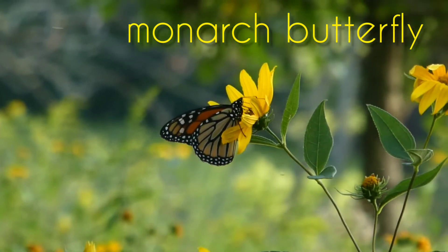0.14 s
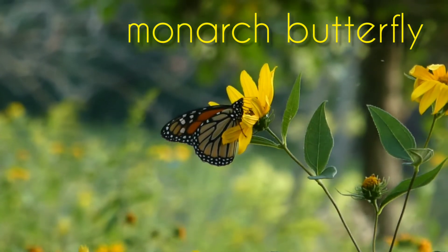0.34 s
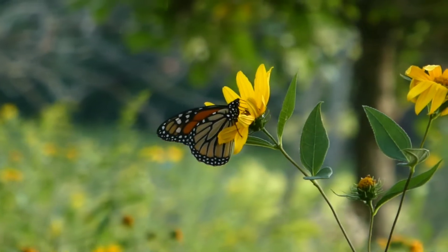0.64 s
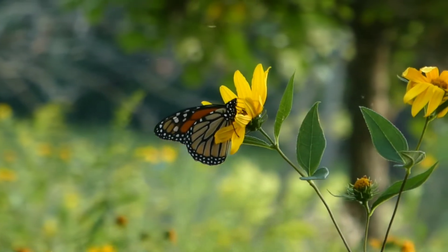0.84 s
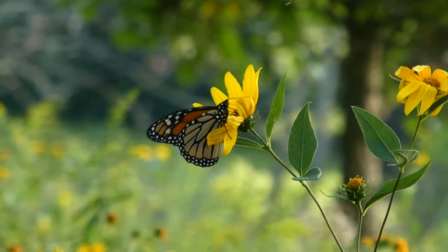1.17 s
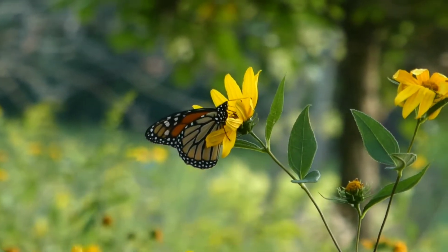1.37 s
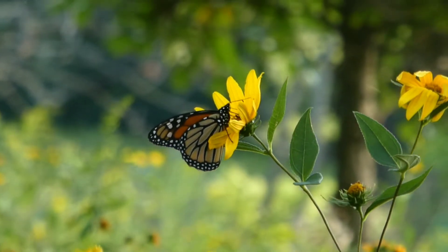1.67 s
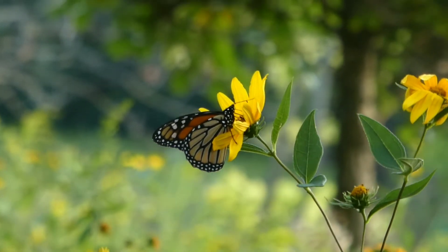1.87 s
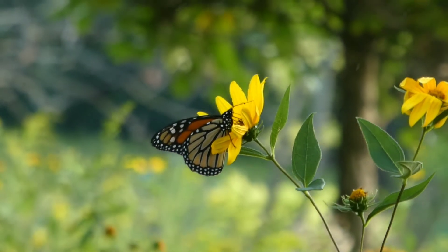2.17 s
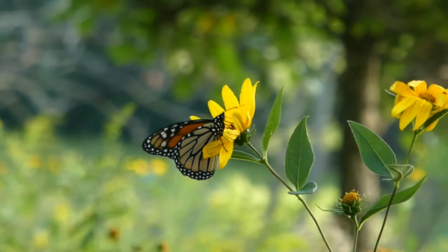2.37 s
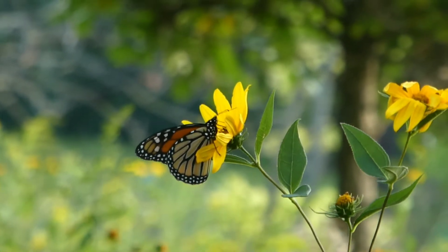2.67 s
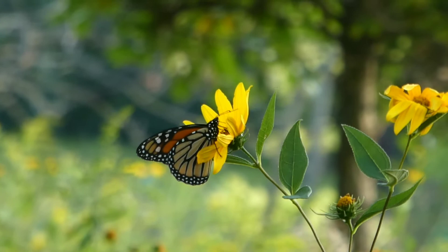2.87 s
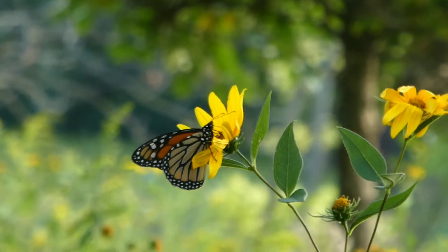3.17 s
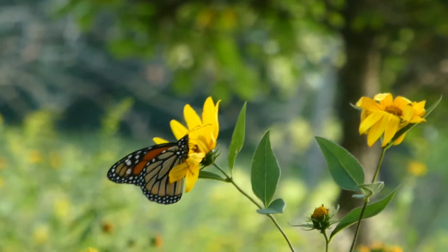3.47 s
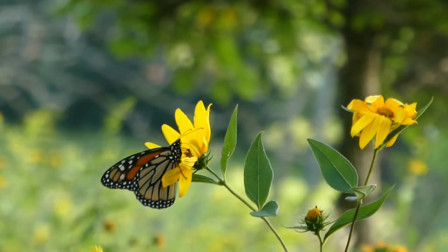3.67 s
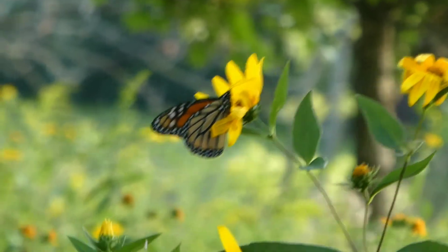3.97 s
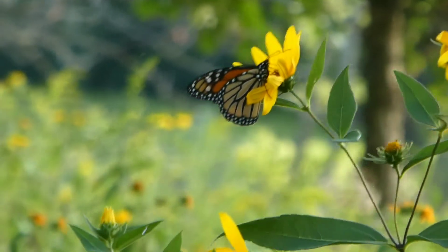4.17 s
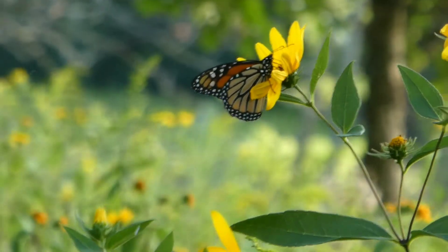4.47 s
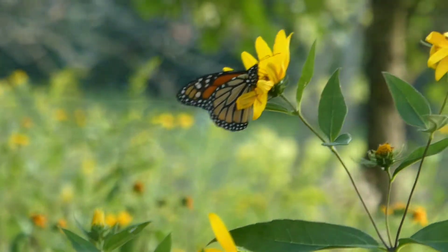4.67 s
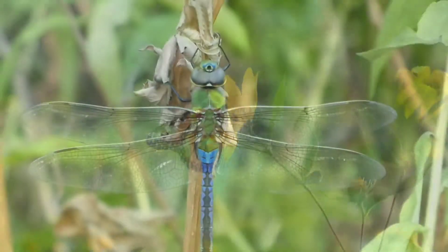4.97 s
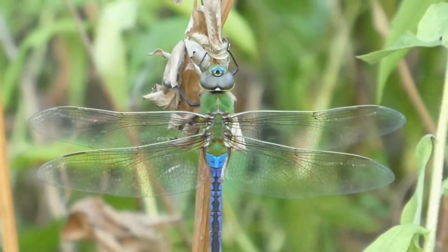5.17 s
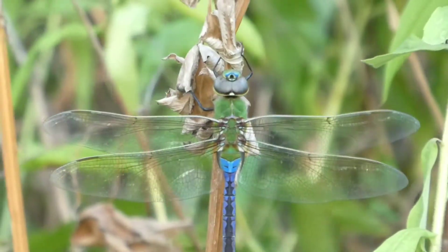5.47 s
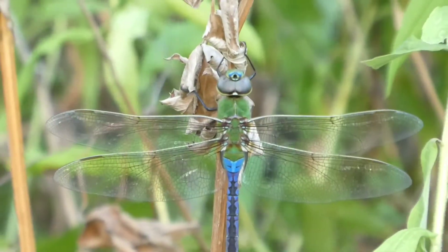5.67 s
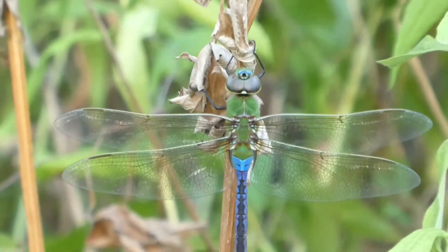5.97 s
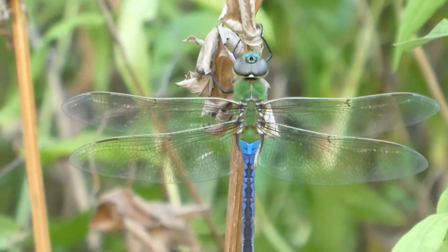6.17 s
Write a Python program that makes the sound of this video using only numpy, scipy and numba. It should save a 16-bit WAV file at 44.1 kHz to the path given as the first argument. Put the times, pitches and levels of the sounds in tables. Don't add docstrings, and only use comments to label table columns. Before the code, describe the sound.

From 0 s a cicada close by is in full song: a loud, dry, high rasp made of hundreds of clicks per second, centred around four to six kilohertz. Roughly every 0.55 s it dips briefly, clicks quickening while the resonance drops to a tighter, lower whirr, then rises again, a continuous see-saw. A quieter neighbour, slightly to the left, pulses out of step, and a far chorus hisses behind. Leaves blur the clicks a little. Beneath lie faint airy noise, a wandering low traffic hum and soft wind buffeting, strongest around 1.8 s. A distant vehicle swells near 4.3 s, and the road sound ends just after 5 s. From about 4.5 to 5.4 s the pulsing singers crossfade away into a dense, even, slightly flickering insect hiss of similar loudness, which continues steadily to the cut at about 6.3 s, rising slightly.

```python
import sys
import numpy as np
from scipy import signal
from scipy.fft import rfft, irfft, next_fast_len
from scipy.io import wavfile
from scipy.ndimage import uniform_filter1d
from numba import njit

SR = 44100
rng = np.random.default_rng(int(sys.argv[2]) if len(sys.argv) > 2 else 0)


def put_to_file(sound):
    columns = np.atleast_2d(sound).T
    safe = np.clip(columns, -1, 1)
    whole_steps = np.round(safe * 32767)
    wavfile.write(sys.argv[1], SR, whole_steps.astype(np.int16))


def linear_from_db(decibels):
    return 10 ** (np.asarray(decibels, float) / 20)


N = 279594
TIME = np.arange(N) / SR


def level(x, db):
    return x * linear_from_db(db) / np.sqrt(np.mean(x ** 2))


def columns(table, at):
    s, *rest = np.transpose(table)
    return [np.interp(at, s, c) for c in rest]


def colour(x, points):
    hz, db = np.transpose(points)
    size = next_fast_len(N)
    f_hz = np.maximum(np.arange(size // 2 + 1) * SR / size, 1)
    gain = linear_from_db(np.interp(np.log(f_hz), np.log(hz), db))
    return irfft(rfft(x, size) * gain, size)[..., :N]


def walk(rate_hz):
    hold = int(SR / rate_hz)
    steps = np.repeat(rng.standard_normal(N // hold + 1), hold)
    return 1.3 * uniform_filter1d(uniform_filter1d(steps, hold), hold)[:N]


def swells(s, length_s, db, floor_db):
    shape = np.cos(np.pi * np.clip((TIME[:, None] - s) / (2 * length_s), -.5, .5)) ** 2
    power = (shape * linear_from_db(db)) ** 2 @ np.ones(len(s))
    return np.sqrt(linear_from_db(floor_db) ** 2 + power)


@njit
def svf(x, hz, width_hz):
    y, b, l = np.empty(len(x)), 0., 0.
    for i in range(len(x)):
        g, k = np.tan(np.pi * hz[i] / SR), width_hz / hz[i]
        v = (b + g * (x[i] - l)) / (1 + g * (g + k))
        b, l, y[i] = 2 * v - b, l + 2 * g * v, k * v
    return y


def clicks(when_s, size):
    out, at = np.zeros(N + 32), np.clip(when_s * SR, 0, N)
    for tap in range(-7, 9):
        d = tap - at % 1
        window = (1 + np.cos(np.pi * d / 8)) / 2
        np.add.at(out, at.astype(int) + tap + 8, size * np.sinc(d) * window)
    return out[8:N + 8]


def cicada(dips, song_db, pan_db, haze_db):
    # t from the dip/s, share of top click rate/1, abdomen f/Hz, level/dB
    cycle = [
        (-.3, .705, 5700, -1.5),
        (-.14, .835, 5900, -0.5),
        (-.105, .945, 5900, -0.5),
        (-.075, .99, 5300, 1),
        (-.05, 1.001, 4180, 0.9),
        (.02, .997, 3650, -0.65),
        (.045, .87, 3800, -1.5),
        (.085, .71, 5300, -3),
        (.3, .705, 5870, -1.5),
    ]
    s, top_hz, dip_db = np.transpose(dips)
    nearest = np.searchsorted((s[1:] + s[:-1]) / 2, TIME)
    share, body_hz, db = columns(cycle, TIME - s[nearest])

    raised_hz, lowered_hz = 5700, 4230
    rib_high_hz, rib_low_hz = 6040, 4350
    rib_high_db, rib_low_db, rib_mute_db = -0.5, 0.5, -3.5
    low = np.clip((raised_hz - body_hz) / (raised_hz - lowered_hz), 0, 1)
    rib_hz = rib_high_hz + (rib_low_hz - rib_high_hz) * low
    moving = np.clip(np.maximum(3.4 * np.minimum(low, 1 - low), low * (1 - share) / 0.14), 0, 1)
    rib_db = rib_high_db + (rib_low_db - rib_high_db) * low + rib_mute_db * moving
    treble_db = -12.5 - 3.5 * low ** 2
    body_hz = body_hz * (1 + .035 * walk(30))

    phase = np.cumsum(share * np.interp(TIME, s, top_hz)) / SR
    beat = np.arange(1, int(phase[-1]))
    when_s = np.interp(beat, phase, TIME)
    second_tymbal = beat % 2
    chance = rng.standard_normal((3000, 2))[:len(beat)].T
    slack = np.clip((1 - share) / .3, 0, 1)
    loose = np.interp(when_s, TIME, slack)
    when_s = when_s + (2e-6 + 2.5e-5 * loose ** 2) * chance[0] + 6.5e-5 * second_tymbal
    size = linear_from_db(-5 * loose * second_tymbal + (.8 + 1.5 * loose) * chance[1])

    rattle = rng.standard_normal(N) * np.exp(-(phase % 1) / .6) * linear_from_db(haze_db + 12 * slack ** 2)
    x = clicks(when_s, size) + rattle
    body = svf(svf(svf(x, body_hz, 3500.0), body_hz, 3500.0), body_hz, 3500.0)
    rib = svf(svf(x, rib_hz, 380.0), rib_hz, 380.0) * linear_from_db(rib_db + 2.5)
    snap = colour(x, [(2500, -31), (3500, 6), (6500, 7.5), (8000, -14.0), (11300, -11.0),
                      (12000, -26), (15000, -45)])
    fizz = colour(rattle, [(6000, -3), (7500, 6.0), (8500, 4.5), (11300, -13.5), (12000, -23), (15000, -35)])
    voice = body + rib + (snap + fizz) * linear_from_db(treble_db + 5.0)
    voice = colour(voice, [(2300, -16), (3000, -5.5), (3300, 2.1), (6400, -2.2), (7200, -2.5), (12000, 1.5)])
    voice = level(voice, song_db) * linear_from_db(db + np.interp(TIME, s, dip_db))
    return voice * linear_from_db(np.array([[pan_db], [-pan_db]]) / 2)


def leaves(x):
    tail_db, t60_s = 0.5, .025
    t = np.arange(2048) / SR
    tail = rng.standard_normal((2, len(t))) * linear_from_db(-60 * t / t60_s)
    tail *= linear_from_db(tail_db) / np.sqrt(np.sum(tail ** 2, axis=1, keepdims=True))
    size = next_fast_len(N + len(t))
    echo = 1 + rfft(tail[0] + 0.22 * tail[1] * np.array([[1], [-1]]), size)
    return irfft(rfft(x, size) * echo / np.sqrt(np.abs(echo)), size)[:, :N]


def chorus(mid, side, mid_db, side_db, scatter_db):
    out = 0
    for lo_hz, hi_hz in [(20, 4200), (4200, 5400), (5400, 7500), (7500, 20000)]:
        scatter = uniform_filter1d(rng.standard_normal((2, N)), size=24) * 2.6
        grain = rng.standard_normal((2, N)) * linear_from_db(scatter_db * scatter)
        band = signal.butter(3, [lo_hz, hi_hz], "band", fs=SR, output="sos")
        flicker_db = 0.88 * walk(4.154) + 0.64 * walk(10)
        out = out + signal.sosfilt(band, grain) * linear_from_db(flicker_db)
    return level(colour(out[0], mid), mid_db) + level(colour(out[1], side), side_db) * [[1], [-1]]


def air(points, db, side_db, wide_hz):
    mid, side = colour(rng.standard_normal((2, N)), points)
    side = level(side, db + side_db)
    return level(mid, db) + colour(side, [(wide_hz / 2, -8.0), (wide_hz, 0)]) * [[1], [-1]]


def traffic():
    # loudest t/s, length/s, rumble level/dB, hum level/dB, hum f/Hz
    passes = [(.1, 0.43, -40, -48, 411), (0.501, 0.32, -44, -47.5, 410), (0.756, .3, -42, -49, 407),
              (1.635, 0.74, -41.5, -52, 397), (2.31, 0.38, -41.5, -51, 395), (2.749, 0.57, -39.5, -53, 400),
              (3.498, 0.74, -43, -52, 400), (4.281, 0.6, -34.5, -43.5, 392), (4.953, 0.42, -41, -43, 388)]
    road_db, road_ends_s = -48, 5.2
    s, length_s, db, hum_db, hum_hz = np.transpose(passes)
    rumble_hz = 339 * (1 + 0.036 * walk(6))
    hum_hz = np.interp(TIME, s, hum_hz) * (1 + 0.01198 * walk(8))
    mid, side, fine = rng.standard_normal((3, N))
    broad = [svf(svf(v, rumble_hz, 355.0), rumble_hz, 355.0) for v in (mid, side)]
    tone = np.sin(2 * np.pi * np.cumsum(hum_hz) / SR) * linear_from_db(3.3 * walk(18))
    hum = level(tone, -2.2) + level(svf(svf(fine, hum_hz, 53.0), hum_hz, 53.0), -3.5)
    rumble = level(broad[0], -3.5) + level(broad[1], -11.5) * [[1], [-1]]
    rumble = rumble * linear_from_db(2.04 * walk(12))
    out = rumble * swells(s, length_s, db, road_db)
    out = out + hum * swells(s, 0.72 * length_s, hum_db, road_db - 11)
    return out * np.clip((road_ends_s - TIME) / 0.075, 0, 1)


def wind():
    # strongest t/s, length/s, level/dB
    gust_table = [(0.856, 0.81, -48.5), (1.433, 0.58, -44.5), (1.82, 0.55, -40), (2.758, .6, -45.5),
                  (3.245, 0.31, -45), (3.7, 0.27, -48), (4.501, 0.56, -59)]
    calm_db = -60
    mid, side = colour(rng.standard_normal((2, N)), [(20, -28), (60, -7), (120, 3.0), (230, -5),
                                                     (400, -13), (900, -38)])
    gust = swells(*np.transpose(gust_table), calm_db) * linear_from_db(2.0 * walk(7.68))
    return (level(mid, -5.5) + level(side, 1.2) * [[1], [-1]]) * gust


def scene():
    # t/s, top click rate f/Hz, level/dB
    near_dips = [(-.165, 414.3, 1.5), (.406, 414.5, -1), (.976, 414.8, -0.5), (1.541, 418.3, -0.7),
                 (2.097, 420, -1.5), (2.658, 418.5, -0.5), (3.201, 421, -1.5), (3.749, 419.2, -1),
                 (4.305, 418.8, -1.8), (4.85, 420.4, -5.5), (5.4, 421, 7)]
    # t/s, top click rate f/Hz, level/dB
    neighbour_dips = [(-.27, 430, 6), (.25, 423, 2.5), (.75, 427, 5), (1.3, 423.8, -2), (1.82, 427.7, 0),
                      (2.33, 425, -2.5), (2.87, 424.8, -0.5), (3.4, 423, -4), (3.93, 421.6, 0.5),
                      (4.5, 427, -9), (5.05, 423, 10), (5.6, 429, -6.0)]
    # f/Hz, level/dB (per Hz)
    first_mid = [(1180, -27.5), (2000, -35.5), (2540, -20.5), (3040, -12), (3430, -5), (3580, -3),
                 (4660, -2), (5210, -5), (5820, 0), (6230, -4.5), (7520, -14), (11000, -25.5), (11600, -37),
                 (12000, -29), (15400, -40)]
    first_side = [(1180, -43), (2000, -18), (2630, -14), (3430, -1), (4170, 2), (4280, -4), (4580, -1.5),
                  (5870, -1), (7150, -8.5), (11000, -11.5), (15400, -28)]
    second_mid = [(1180, -59), (2000, -49), (2770, -19.5), (3090, -12), (3340, -8), (3640, -2),
                  (3930, -1.5), (4240, -2.5), (5080, -3), (6020, 0.5), (7650, -15.5), (8480, -14),
                  (9080, -20), (11900, -26.5), (15400, -48)]
    second_side = [(1180, -50), (2000, -52), (2770, -12), (3670, 2), (4030, 0), (4990, -4), (5440, 2.5),
                   (6070, -2), (7650, -10), (11600, -14.5), (15400, -33)]
    # f/Hz, level/dB (per Hz)
    first_air = [(15, -49), (25, -36), (76, -1.5), (216, -5.5), (278, 1), (403, -9), (479, -7.5),
                 (721, -4.5), (965, -5), (2270, -13), (2600, -18), (3380, -7), (5720, -120)]
    second_air = [(15, -60), (25, -30), (70, -6.5), (138, -1.5), (189, -4.5), (289, -6), (452, -10),
                  (795, -5), (2100, -12), (2600, -14), (3380, -40), (5720, -120)]
    # t/s, level/dB, left minus right/dB
    swell = [(0.0, -0.5, -0.5), (0.28, -0.36, -1.5), (4.22, 0.86, -1.5), (4.82, 1.3, -1.0),
             (5.05, -0.3, 0.5), (6.23, 0.1, 1.0), (6.34, 1, -0.5)]
    # start t/s, end t/s
    dissolve_s = (4.49, 5.43)

    swell_db, pan_db = columns(swell, TIME)
    singers = cicada(near_dips, song_db=-25.5, pan_db=-0.5, haze_db=-32)
    singers = singers + cicada(neighbour_dips, song_db=-34.5, pan_db=3.5, haze_db=-20)
    first = leaves(singers) + chorus(first_mid, first_side, mid_db=-29.5, side_db=-39.5, scatter_db=0.4)
    first = first + air(first_air, db=-43.0, side_db=-5.5, wide_hz=200.)
    second = chorus(second_mid, second_side, mid_db=-23.0, side_db=-34.5, scatter_db=1.3)
    second = second + air(second_air, db=-43.0, side_db=-5.5, wide_hz=310.0)
    mix = np.clip((TIME - dissolve_s[0]) / (dissolve_s[1] - dissolve_s[0]), 0, 1)
    insects = ((1 - mix) * first + mix * second) * linear_from_db(swell_db)
    return (insects + traffic() + wind()) * linear_from_db(np.array([pan_db, -pan_db]) / 2)


def top_cut(x):
    return signal.sosfilt(signal.butter(12, 15570, fs=SR, output="sos"), x)


def record(dry):
    return top_cut(dry)


dry = scene()
out = record(dry)
put_to_file(out)
```